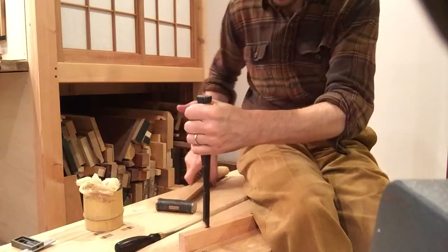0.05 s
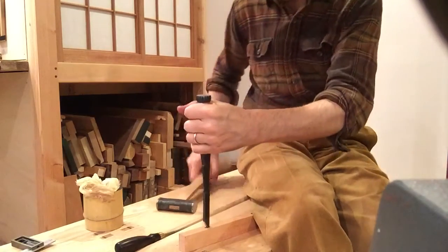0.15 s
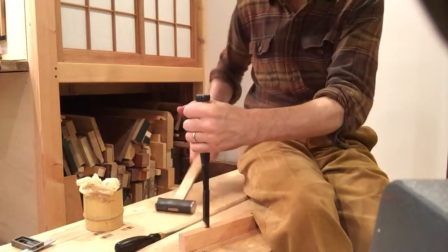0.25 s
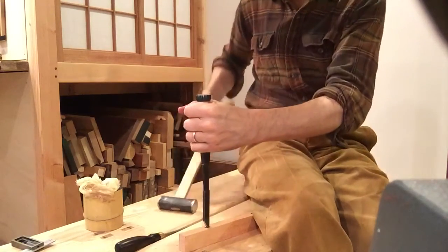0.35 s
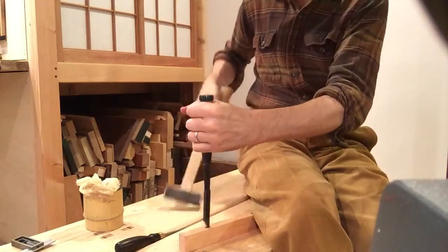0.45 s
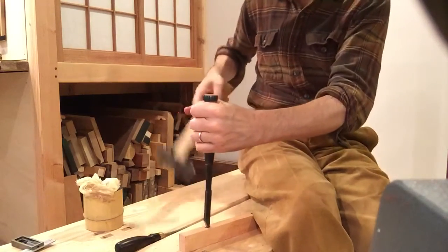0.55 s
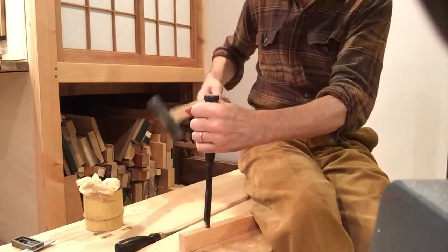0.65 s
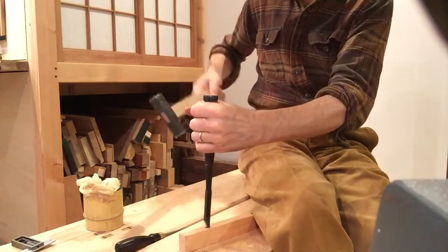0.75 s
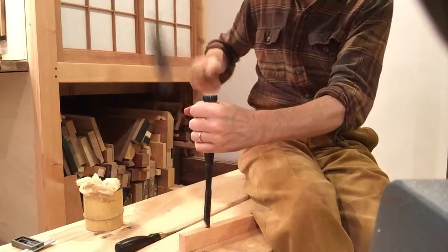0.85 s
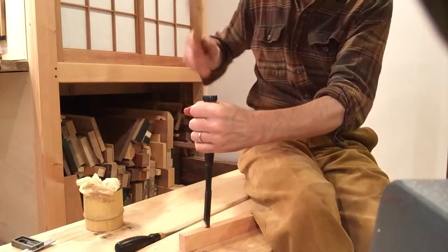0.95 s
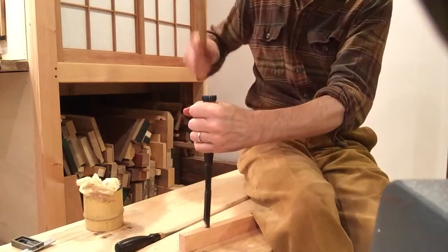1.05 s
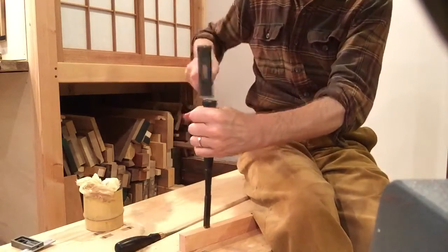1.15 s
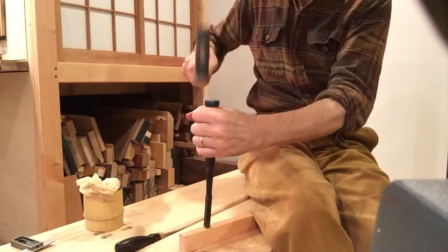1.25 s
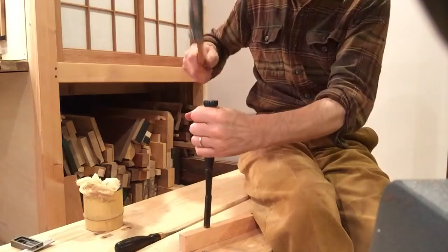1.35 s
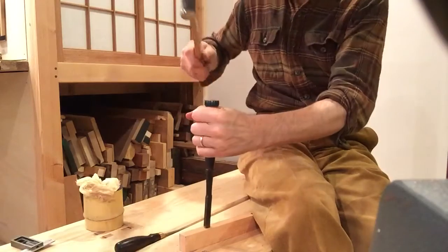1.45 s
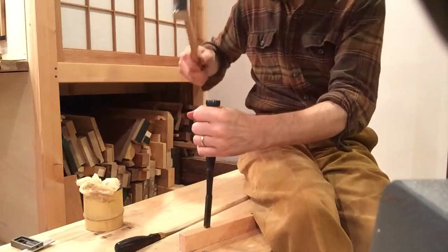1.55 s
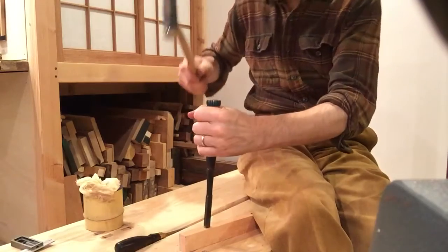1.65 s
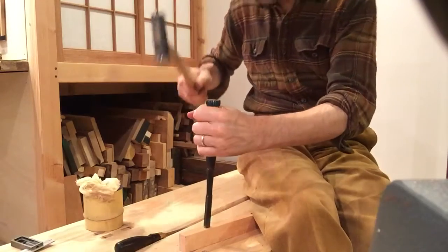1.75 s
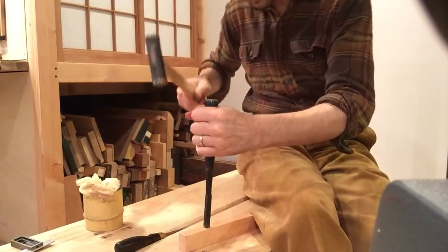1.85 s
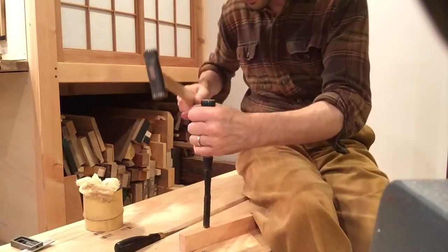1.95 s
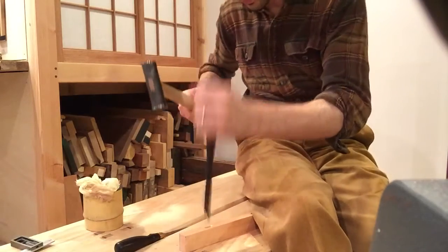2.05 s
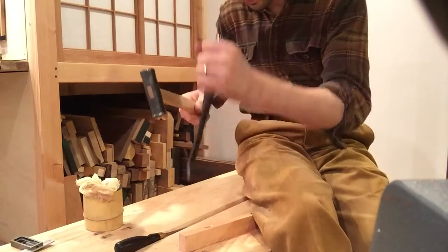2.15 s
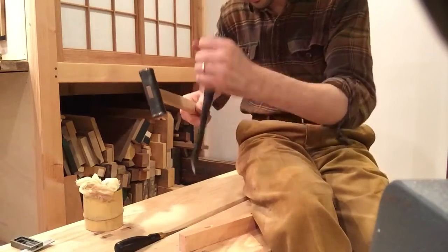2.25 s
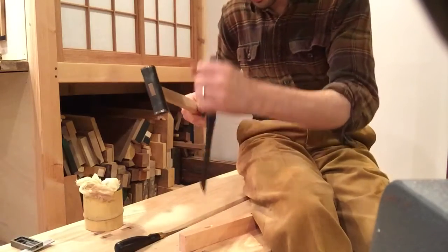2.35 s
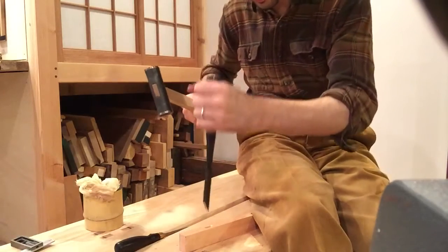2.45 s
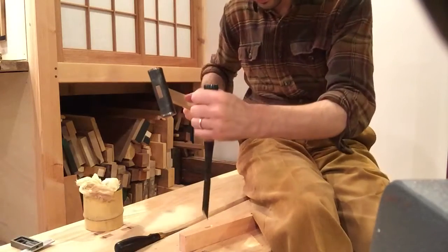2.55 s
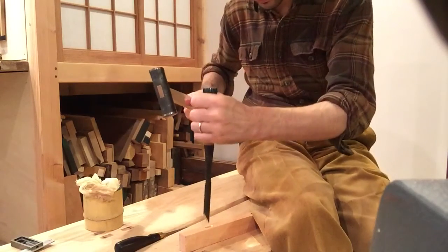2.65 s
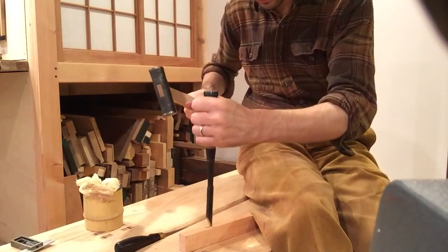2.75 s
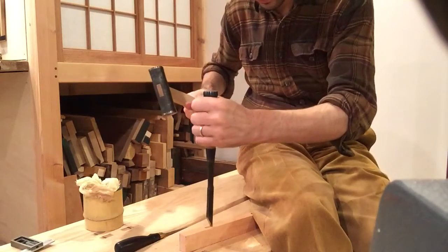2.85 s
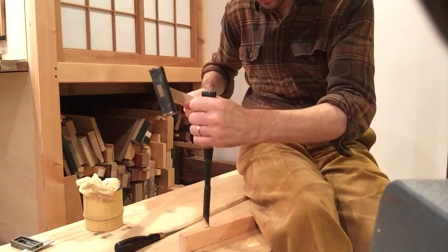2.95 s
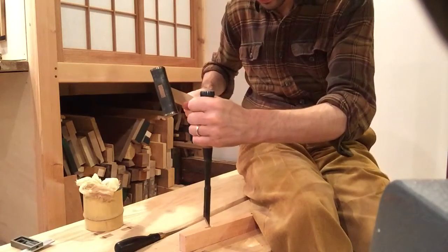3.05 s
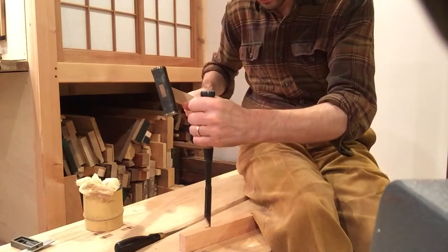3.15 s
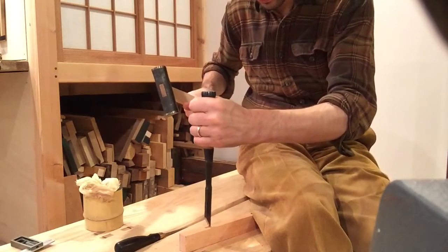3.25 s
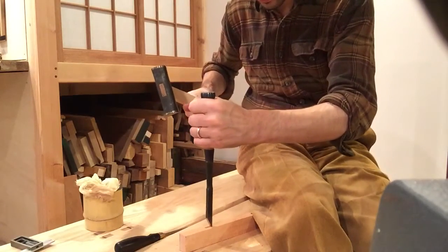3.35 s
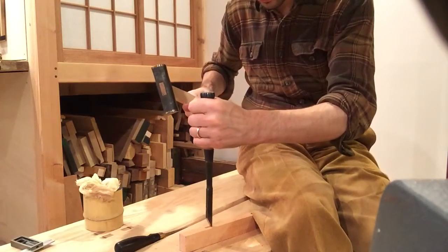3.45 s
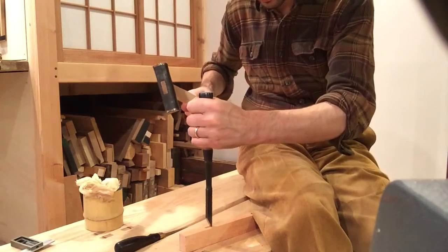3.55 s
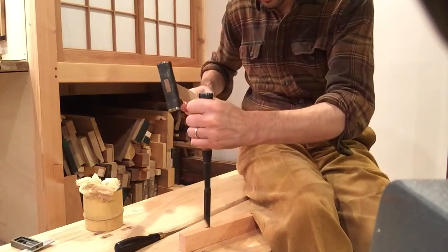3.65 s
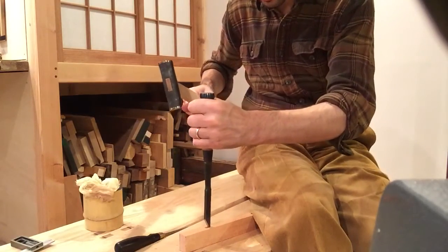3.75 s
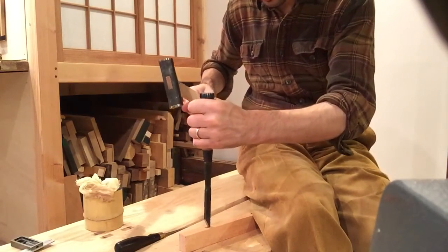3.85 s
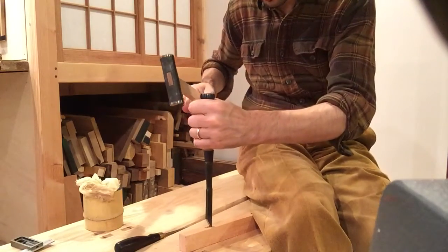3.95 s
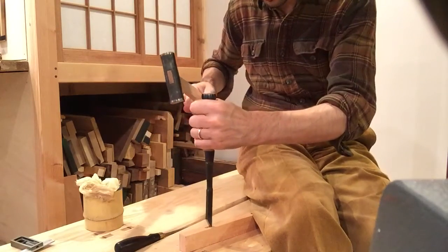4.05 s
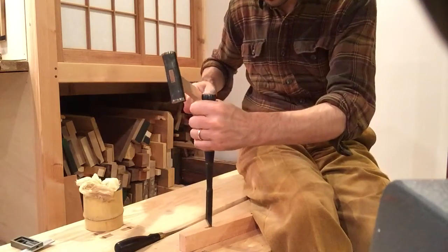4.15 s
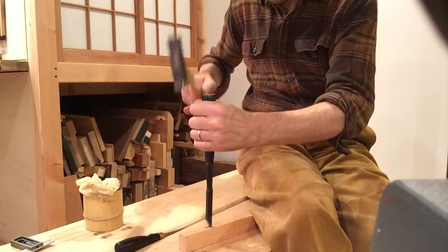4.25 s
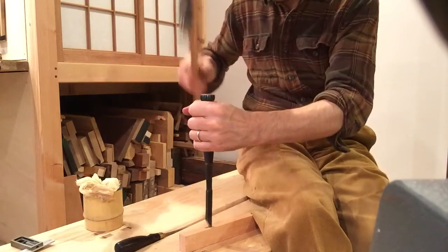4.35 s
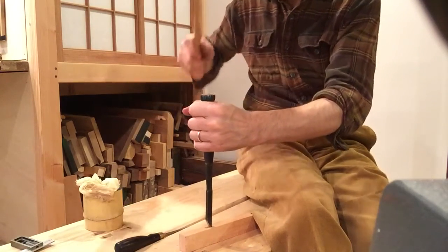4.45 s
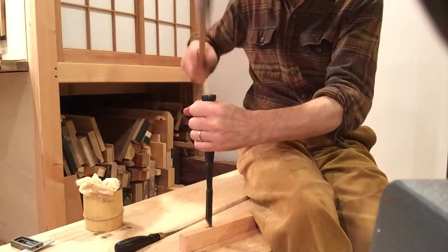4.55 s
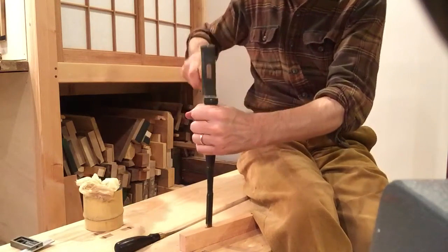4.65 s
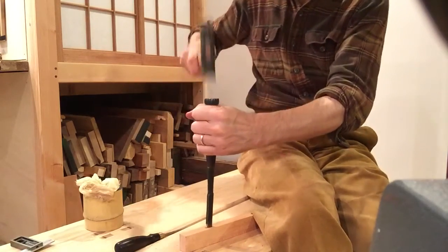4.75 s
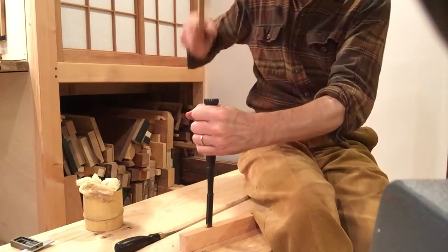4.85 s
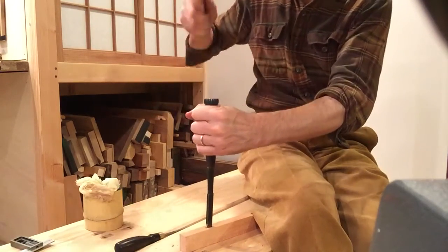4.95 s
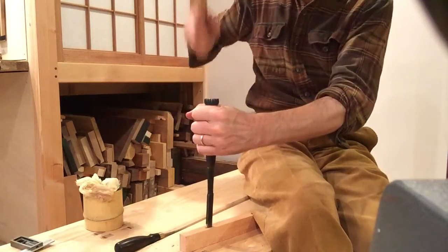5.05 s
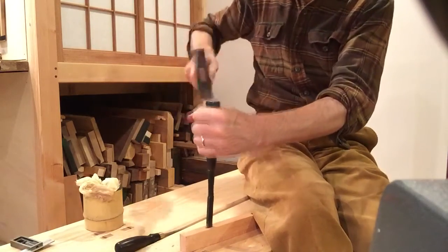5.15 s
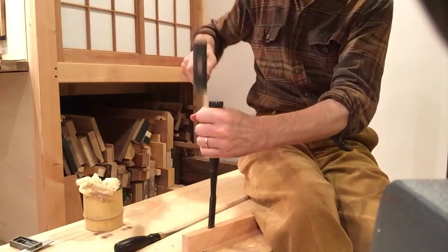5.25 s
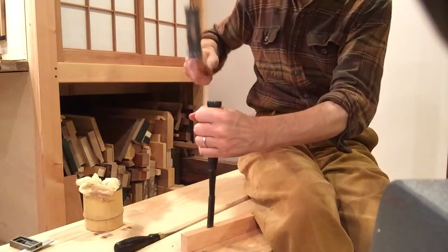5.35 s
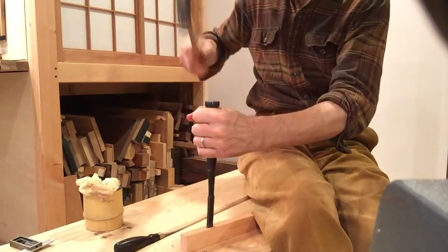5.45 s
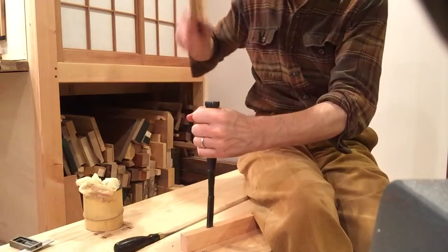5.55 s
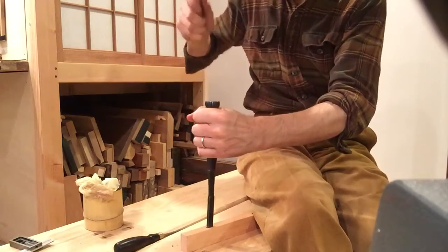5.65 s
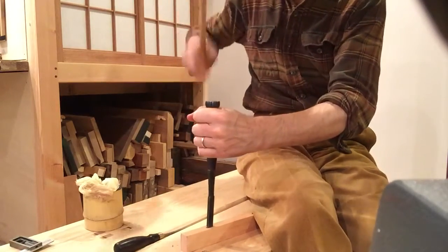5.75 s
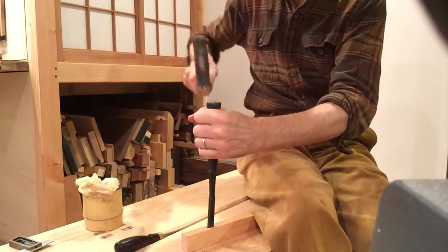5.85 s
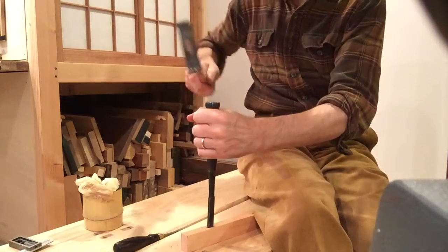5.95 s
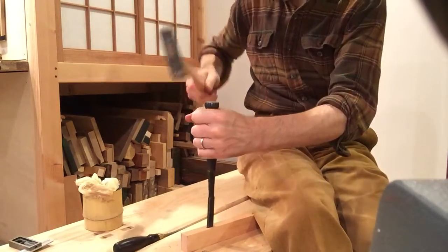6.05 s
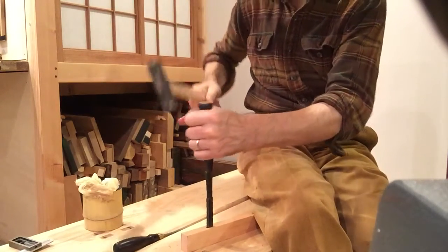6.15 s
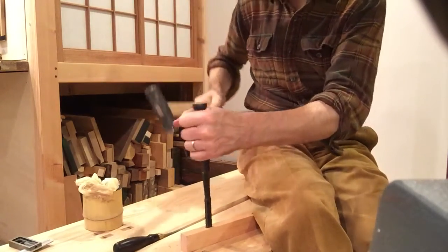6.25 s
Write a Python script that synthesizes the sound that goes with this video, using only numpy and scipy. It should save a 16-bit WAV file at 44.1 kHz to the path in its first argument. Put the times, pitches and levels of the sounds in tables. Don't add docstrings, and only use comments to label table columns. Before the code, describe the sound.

A small wooden workshop, heard very close, with faint hiss and a wavering low rumble from outside. From 0 to 0.5 s a hammer is dragged softly over the bench, a barely audible low wooden rub with sleeve rustle. At 1.15 s a hard steel blow on a chisel cracks out, clipping the input: bright midrange crack, splitting fibres, brief blade ring, bench boom and a rattling tail of under half a second. Around 2.03 s the blade levers out with a quick cluster of knocks, ticks and crunching splinters. Much quieter wooden knocks and edge ticks come near 2.8, 3.15, 3.35, 3.6, 3.92 and 4.28 s. Three more overloaded blows land at 4.63, 5.16 and 5.82 s, the later ones with fuller bench boom and floor thump, loose shelves and tools ringing on shortly. At 6.29 s the steel edge gives one small bright tick.

```python
import sys
import numpy as np
from scipy import signal
from scipy.fft import rfft, irfft
from scipy.io import wavfile

SR = 44100
rng = np.random.default_rng(int(sys.argv[2]) if len(sys.argv) > 2 else 0)


def natural_amplitude(level_db):
    exponent = np.asarray(level_db, float) / 20
    return 10 ** exponent


def to_wav(sig):
    pcm = np.clip(np.atleast_2d(sig), -1, 1) * 32767
    pcm = np.round(pcm).astype(np.int16)
    wavfile.write(sys.argv[1], SR, pcm.T)


N = 278271
T = np.arange(SR // 2) / SR


def hiss():
    return rng.standard_normal(len(T))


def fade(t60):
    return np.exp(-np.log(1000) * T / t60)


def swell(rise_s):
    return 1 - np.exp(-T / rise_s)


def bump(t, centre_s, half_s):
    return np.exp(-((t - centre_s) / half_s) ** 2)


def unit(x):
    return x / np.abs(x).max()


def colour(x, points):
    hz = np.maximum(np.arange(len(x) // 2 + 1) * SR / len(x), 1)
    point_hz, point_db = np.array(points).T
    return irfft(rfft(x) * natural_amplitude(np.interp(np.log(hz), np.log(point_hz), point_db)), len(x))


def band(x, hz, width):
    return signal.lfilter(*signal.iirpeak(hz, hz / width, fs=SR), x)


def steep(x, hz, width):
    return unit(band(band(band(x, hz, width), hz, width), hz, 1.2 * width))


def ring(modes, scatter_db, shorter):
    total = 0
    for hz, db, t60 in modes:
        share, detune = rng.standard_normal(2)
        tone = np.sin(2 * np.pi * hz * (1 + 0.00043 * detune) * T)
        total = total + natural_amplitude(db + scatter_db * share) * fade(t60 * shorter) * tone
    return total


def add(out, s, sound):
    i = int(s * SR)
    out[i:i + len(sound)] += sound[:len(out) - i]


def wander(rate):
    return np.interp(np.arange(N) / SR * rate, np.arange(256), rng.standard_normal(size=256))


# t/s, peak level/dB, chisel ring f/Hz, bench level/dB, depth of the bench tone/0-1
BLOWS = [
    (1.1518, 6.5, 2963, -20.5, 0.37),
    (4.630, 3.5, 3294, -19, 0.53),
    (5.1646, 5, 3012, -14, 0.47),
    (5.8223, 3.5, 3090, -13.5, 0.33),
]
# f/Hz, level/dB, t60/s
BENCH = [(120, -24, 0.41), (184, -1, .3), (200, -7, 0.4), (281.5, -1.5, 0.18), (300, 0.5, 0.15),
         (482, -3.5, 0.075), (790, -20.5, .1), (950, -8.5, .08)]
# f/Hz, level/dB, t60/s
CHISEL = [(1561, -15.5, 0.27), (1771, -17.5, 0.38), (2342, -15, 0.33), (2370, 1, 0.72), (2640, 0.5, 0.37),
          (2981, 0.5, 0.15), (3085, -2.5, 0.26), (3160, -5.5, 0.64), (5000, -17, 0.13), (6175, -31.5, 0.32),
          (6500, -12, 0.3), (7700, -12, 0.19), (7300, -14.5, 0.16), (8947, -23, 0.2)]


def blow(tones, db, ring_hz, bench_db, depth):
    crack = unit(split(*tones) * (fade(0.028) + natural_amplitude(-11.0) * fade(0.1)))
    contact = unit(band(hiss(), 6500.0, 13000.0) * fade(0.0022))
    crack = crack + natural_amplitude(-11.5) * contact
    blade = unit(band(hiss(), ring_hz, 110.0) * fade(0.057))
    steel = unit(ring(CHISEL, 1.5, .4))
    modes = depth * ring(BENCH[:3], 1.5, .5) + (1 - depth) * ring(BENCH[3:], 1.5, 0.78)
    boom = colour(hiss(), [(90, -30.5), (180, -3.5), (300, 0.5), (450, 2.5), (700, -5.5), (1000, -21.5)])
    bench = unit(modes * swell(.004)) + natural_amplitude(-4.5) * unit(boom * fade(0.1) * swell(0.0027))
    mix = natural_amplitude(6.0) * crack + natural_amplitude(-6.5) * blade + natural_amplitude(-24) * steel + natural_amplitude(bench_db - 1.0) * bench
    return natural_amplitude(db) * mix


# f/Hz, level/dB per Hz
SPLIT = [(210, -41.5), (350, -19.5), (700, -14), (1500, -9.5), (3000, -11), (7500, -13.5), (9000, -23.5),
         (16000, -44.5)]
# f/Hz, width/Hz, level/dB
PLANK = [(930, 520, 0), (2350, 430, 5), (2740, 350, 3.5), (3180, 510, 5.5), (4400, 380, -2.5),
         (5820, 900, -1), (7220, 600, 2)]
# end tone level/dB, grain tone f/Hz, grain tone level/dB,
# upper tones level/dB, bench hum in the tail level/dB
ANSWERS = [(10, 1300, 10, -2, -6.5), (4, 1100, 9, -0.5, -9.5), (15.5, 1700, 10, -6, 6.5),
           (5, 1200, 0.5, -5.5, 3)]


def split(end_db, grain_hz, grain_db, upper_db):
    noise = colour(hiss(), SPLIT)
    upper = 0
    for hz, width, db in PLANK:
        scatter_db = 3 * rng.standard_normal()
        upper = upper + natural_amplitude(db + scatter_db) * band(noise, hz, width)
    end = band(noise, 570, 70)
    grain = band(noise, grain_hz, 290)
    return noise + natural_amplitude(upper_db) * upper + natural_amplitude(end_db) * end + natural_amplitude(grain_db) * grain


TINT_HZ = 800, 1150, 1500, 1900, 2350, 2700, 3050, 3800, 4350, 5300, 6400
TINTS = [(0, -4, 0.5, 1.5, 0, -0.5, 2.3, 1.5, -3, 3, 1.5),
         (-1.6, -2.5, -3.5, -0.4, 2.5, 3, 0.1, 0.85, -0.14, .1, .1),
         (-1, -10, 1.5, -1, -2, -4, 2.9, -5, 1, .1, .1),
         (-6, 0, 0.36, 2.5, 2.5, -1.23, 1.5, -0.5, 1.5, .1, .1)]


def tinted(sound, tint, treble_db):
    return colour(sound, [(600, 0), *zip(TINT_HZ, tint), (7800, 0), (9000, treble_db)])


# f/Hz, level/dB, t60/s
SEATED_HIGH = [
    [(1206, -13.5, 0.13), (1470, -9.5, 0.3), (2320, 0, 0.14), (2498, -5, 0.14), (2770, -10, 0.21),
     (2966, -3, 0.12), (3180, -2.5, 0.22), (3462, -10.5, 0.35), (4000, -11, 0.25), (4250, -15, 0.15)],
    [(1294, -10, 0.25), (2225, -0.5, 0.1), (2400, -7, 0.2), (2610, -8, 0.2), (2724, -14, 0.44),
     (2990, -6.5, 0.15), (3180, -7.5, 0.21), (3430, -8, 0.16), (4118, -14, 0.097), (4450, -16.5, 0.29)],
    [(1510, -12.5, 0.33), (1583, -4.5, 0.26), (1820, -14.5, 0.3), (1980, -20.5, 0.58), (2300, -12.5, 0.48),
     (2830, -10, 0.2), (3050, 1.5, 0.19), (3000, -3, 0.15), (3530, -12, 0.14), (3570, -12, 0.16)],
    [(1400, -8.5, 0.15), (1804, -19.5, 5.0), (2180, -15.5, 0.97), (2360, -3.5, 0.2), (2820, -13, 0.43),
     (3190, 0, 0.13), (3240, -4.5, 0.21), (3360, -8.5, 0.11), (3849, -19, 0.36), (4452, -13, 0.23)],
]
SEATED_LOW = [
    [(285, 0, 0.098), (490, -7, 0.14), (824, -10.5, 0.095), (930, -10, 0.11)],
    [(188, -9, 0.24), (296, 0.5, 0.093), (504, -14, 0.23), (830, -9, 0.13)],
    [(186, -1.5, 0.11), (280, 1, .1), (300, -8, 0.25), (497, -11.5, .2), (593, -11, 0.13), (760, -12, 0.2),
     (967, -10.5, 0.079)],
    [(185, -12.5, 0.13), (280, -3.5, .09), (309.3, -16.5, 0.25), (498, -9.5, 0.12), (400, -7.5, 0.064),
     (573, -15, .1)],
]
# high notes level/dB, low notes level/dB, treble level/dB, jolt through the stand level/dB
SEATS = [(-14, -22, 2.5, -55), (-11, -24.5, -1, -35.5), (-10.5, -5, -1.5, -31), (-12, 1.5, 3.5, -27)]


def notes_of(modes):
    total = 0
    for k, (hz, db, t60) in enumerate(modes):
        tone = np.sin(2 * np.pi * hz * T + k * k)
        total = total + natural_amplitude(db) * fade(min(t60, .28)) * tone
    return unit(total)


def seated(high, low, high_db, low_db, jolt_db):
    jolt = unit(np.sin(2 * np.pi * 42 * T) * fade(0.078) * swell(.004))
    high_notes = natural_amplitude(high_db) * notes_of(high) * swell(.0015)
    low_notes = natural_amplitude(low_db) * notes_of(low) * swell(.003)
    return high_notes + low_notes + natural_amplitude(jolt_db) * jolt


# floor thump level/dB, thump f/Hz, far end of the shop level/dB, level/dB of the haze just
THUMPS = [(-28.5, 100, -30, -44.5), (-30, 69, -33, -46.5), (-22.5, 110, -28, -42.5), (-30, 98, -28.5, -39)]
# f/Hz, level/dB per Hz
CRACK = [(350, -30.5), (600, -6.5), (1450, -6), (3190, -6.5), (4900, -10.5), (7500, -10.5), (8600, -22),
         (16300, -43.5)]
# f/Hz, level/dB
LATE = [(150, -5.5), (420, -12.5), (950, -8.5), (1400, -2.5), (3000, 0), (7000, -1), (9500, -2.5),
        (14000, -14.5)]
# f/Hz, width/Hz, level/dB
RATTLES = [(930, 76, -15), (1555, 51, -7.5), (2320, 84, -3), (2980, 120, -4.5), (3400, 80, -7.5),
           (4300, 110, -8), (5400, 80, -8), (5895, 81, -12.5), (6860, 110, -11.5), (7200, 90, -12.5),
           (8600, 1500, -10.5)]


def aftermath(hum_db, thump_db, thump_hz, far_db):
    thump = unit(np.sin(2 * np.pi * thump_hz * T) * fade(0.17) * swell(0.0098))
    rings = 0
    for hz, width, db in RATTLES + [(280, 79, hum_db)]:
        rings = rings + natural_amplitude(db) * band(hiss(), hz, width) / np.sqrt(width)
    far = colour(colour(hiss(), CRACK), LATE)
    far = far / far.std() * fade(0.55) + natural_amplitude(-5.5) * rings / rings.std() * fade(0.71)
    ending = 1 / (1 + (T / 0.44) ** 8)
    return natural_amplitude(thump_db) * thump + natural_amplitude(far_db) * far * swell(0.012) * ending


# above f/Hz, t after the blow/s, loss level/dB
DROPS = [
    (13260, .065, -3),
    (13000, 0.16, -10),
    (9600, 0.17, -7.5),
    (8170, 0.25, -4),
]


def dropped(x):
    for hz, after_s, loss_db in DROPS:
        gone = np.zeros(N)
        for s, *_ in BLOWS:
            add(gone, s + after_s, swell(.004)[:SR // 4])
        top = signal.sosfiltfilt(signal.butter(8, hz, "highpass", fs=SR, output="sos"), x)
        x = x - (1 - natural_amplitude(loss_db)) * gone * top
    return x


def haze():
    out = np.zeros(N)
    lead_s = .0232
    tilt = [(400, -4.0), (1500, -4.5), (3000, 0.1), (8000, -5.5), (12000, -4.0)]
    for (s, *_), (*_, db) in zip(BLOWS, THUMPS):
        noise = colour(colour(hiss(), CRACK), tilt)
        puffs = fade(.03) * np.sin(np.pi * T / .003) ** 2
        shape = (1 + natural_amplitude(5) * puffs + (T / lead_s) ** 4) * (T < lead_s)
        add(out, s - lead_s, natural_amplitude(db) * noise / noise.std() * swell(.001) * shape)
    return out


# t/s, peak level/dB, plank tone f/Hz, bench level/dB, depth of the bench tone/0-1
KNOCKS = [(0.065, -68, 960, -9, 0.6), (0.172, -74, 970, -7.5, 0.6), (2.027, -30, 790, 1.5, 0.36),
          (2.036, -29.5, 913, -43, 0.7), (2.048, -30.5, 550, -4, 0.01), (2.786, -43.5, 700, -8, 0.07),
          (3.015, -64, 684, -5.5, 0.4), (3.158, -35.5, 717, -26, 0.13), (3.331, -46, 840, -0.5, 0.98),
          (3.34, -47.5, 765, 3, 0), (3.36, -59.5, 822, 18, 0.05), (3.593, -52, 837, -3, 0.36),
          (3.602, -46.5, 852, -32.5, 0.78), (3.615, -63, 810, 10.5, 0.2), (3.909, -52.5, 715, -21, 0.6),
          (3.921, -54, 960, -30.5, 0.7), (3.926, -50, 1016, 3, 0.4), (3.955, -57.5, 677, 13, 0.28),
          (4.12, -80, 600, 20, 0.3), (4.282, -58.5, 880, -6, 0.23)]


def knock(db, tone_hz, bench_db, depth):
    touch = hiss() * fade(0.032) * swell(0.0012)
    plank = steep(touch, tone_hz, 474.0) + natural_amplitude(-11.0) * steep(touch, 830.0, 780.0)
    handle = steep(touch, 2200.0, 610.0)
    bench = depth * ring(BENCH[1:3], 0.66, 0.31) + (1 - depth) * ring(BENCH[3:6], 0.98, 0.25)
    return natural_amplitude(db + 1.5) * (plank + natural_amplitude(-45) * handle + natural_amplitude(bench_db) * unit(bench * swell(0.061)))


# f/Hz, width/Hz
EDGE = [(4400, 1390), (7200, 2400), (11400, 2000)]
# t/s, peak level/dB, blade f/Hz, lowest edge resonance level/dB, sharpness level/dB
TICKS = [(2.0245, -41.5, 2340, -9, -44), (2.031, -34.5, 2605, -23.5, -51), (2.046, -49.5, 3160, -25, -45),
         (2.7844, -64, 2770, -10, -16), (2.9144, -66.5, 3300, -14.5, -17.5), (3.1592, -42, 2710, -32, -20),
         (3.3363, -50, 2280, -11.5, -2), (3.5938, -58, 2657, -15, -14), (3.5992, -58, 2350, -2.5, 6.5),
         (3.6016, -50, 2607, -5.5, -5), (3.925, -34, 2454, -14.5, -14), (3.9454, -51, 2646, -22.5, -11),
         (4.2814, -80, 2800, -12, -14), (6.2929, -25.5, 2810, -9, -12.5)]


def tick(db, blade_hz, low_db, sharp_db):
    touch = hiss() * fade(0.016)
    middle_db = -8 + 0.32 * sharp_db
    sound = steep(touch, blade_hz, 930.0)
    for (hz, width), edge_db in zip(EDGE, (low_db, middle_db, sharp_db)):
        sound = sound + natural_amplitude(edge_db) * steep(touch, hz, width)
    return natural_amplitude(db) * sound


# f/Hz, level/dB
TEAR = [(300, 0), (800, 5), (1500, 17.5), (3000, -4), (6000, -14), (9000, -31), (15000, -32.5)]
# t/s, peak level/dB, t60/s, strongest f/Hz
TEARS = [(2.018, -50, 0.058, 1102), (2.026, -32, 0.028, 1490), (2.034, -35, 0.069, 1484),
         (2.048, -43, 0.18, 1295), (3.333, -49, 0.047, 1003), (3.345, -62.5, 0.043, 1900),
         (3.591, -51.5, 0.043, 996), (3.61, -66, 0.035, 2300), (3.92, -41.5, 0.069, 1053),
         (3.94, -58, 0.046, 3495), (4.283, -65, .05, 1950), (6.2935, -39, 0.04, 1608)]


def tear(db, t60, tone_hz):
    shifted = [(hz * tone_hz / 1500, level_db) for hz, level_db in TEAR]
    return natural_amplitude(db) * unit(colour(hiss(), shifted) * fade(t60) * swell(0.00064))


# t/s, peak level/dB, f/Hz, t60/s, width/Hz
PINGS = [(0.029, -59, 980, 0.15, 60), (0.062, -59.5, 980, 0.14, 78), (0.17, -60, 950, 0.083, 160),
         (2.915, -63, 3305, 0.045, 150), (3.162, -50, 1603, 0.11, 400), (3.205, -57, 1570, 0.12, 250),
         (3.338, -54, 2510, 0.094, 349), (3.605, -47, 1786, 0.039, 347),
         (3.93, -49.5, 2586, 0.23, 450), (3.931, -45, 675, 0.098, 200),
         (2.038, -66, 7200, 0.13, 1200), (3.602, -61.5, 7100, 0.09, 700),
         (3.927, -63, 7000, 0.095, 802), (3.93, -63, 4600, 0.067, 1500),
         (3.603, -64, 4560, 0.039, 896), (3.158, -69, 3080, 0.034, 904),
         (3.34, -69, 4500, 0.046, 1500),
         (1.2, -35, 1387, 0.42, 200), (1.202, -38, 3140, 0.42, 503.4), (1.25, -45, 2260, 0.36, 400),
               (2.04, -47, 1260, 0.28, 499), (2.161, -61, 185.7, 0.44, 50), (4.636, -16, 2640, 0.11, 300),
               (4.661, -26.5, 1306, 0.31, 200), (4.681, -38.5, 2210, 0.43, 200),
               (4.8, -54, 1365, 0.52, 149.5), (5.191, -22, 3150, 0.17, 251.6), (5.2, -37, 2950, 0.36, 251),
               (5.2, -35.5, 728, 0.34, 152.8), (5.219, -30, 1485, 0.41, 300), (5.25, -36, 994, 0.43, 300),
               (5.301, -43.5, 187, 0.38, 30), (5.47, -71, 1592, 1.5, 45), (5.829, -15.5, 519, 0.15, 91.7),
               (5.925, -33.5, 300, 0.25, 90.5), (5.952, -49.5, 1070, 0.45, 200),
               (5.964, -38, 188, 0.28, 30.1), (6.119, -70, 1596, 0.89, 70),
         (1.155, -15.5, 510, 0.11, 60), (1.156, -14.5, 1598, .08, 353.4),
               (3.149, -54, 700, 0.052, 400), (3.159, -33, 1620, 0.024, 440), (3.308, -61, 798, 0.14, 400),
               (3.312, -66.5, 2541, 0.088, 300), (3.339, -58, 1630, 0.079, 351),
               (3.603, -59, 2510, 0.1, 250), (3.603, -58, 848, 0.1, 250), (3.908, -53.5, 1693, 0.045, 300),
               (3.909, -62, 3000, 0.046, 500), (3.95, -55, 950, 0.15, 300), (4.104, -55, 290.5, 0.22, 60),
               (4.11, -70, 2506, 0.16, 200), (4.28, -54.5, 857, 0.095, 80), (4.64, -22, 558.6, 0.22, 200),
               (4.68, -17, 1010, .05, 504), (5.168, -17.5, 504, 0.16, 69), (5.168, -18, 775, .08, 200),
               (5.17, -22.5, 1575, 0.069, 120), (5.7992, -31.5, 3594, 0.014, 3020),
               (5.811, -43, 4240, 0.017, 3020), (5.812, -32.5, 280, .1, 200),
               (5.824, -10, 2120, .07, 501.4), (5.83, -10, 5000, 0.077, 250.1),
               (5.83, -14.5, 6370, 0.19, 700),
         (2.0125, -52, 6996, .012, 6000), (2.024, -64, 9970, 0.01, 4000), (2.033, -63, 11030, 0.027, 4000),
         (2.050, -66, 11000, .02, 4000), (2.032, -46, 3000, 0.14, 1000), (2.786, -73, 1020, 0.058, 250),
         (3.1545, -60, 9000, .012, 7000), (3.1545, -67, 14000, .012, 2500), (3.160, -68, 14000, .012, 2500),
         (3.599, -63, 14000, 0.018, 2500), (3.604, -65, 13500, .04, 2000), (3.925, -64, 14000, .02, 2500),
         (5.799, -48, 11070, .015, 5000), (5.811, -54.5, 10950, 0.011, 5000),
         (6.166, -66, 10670, .012, 1500), (6.2925, -34.5, 7040, 0.019, 900), (6.297, -47, 7400, 0.19, 400),
         (6.2925, -57, 14200, 0.018, 900), (1.168, -16.5, 2400, 0.031, 2500),
         (1.203, -22, 2200, 0.039, 2500), (1.221, -29, 2800, 0.042, 900), (4.650, -19, 2800, .03, 1200),
         (4.680, -23, 2500, .03, 2500), (4.701, -26, 2720, 0.068, 150), (4.734, -30, 2200, 0.031, 2000),
         (5.196, -18, 3000, .04, 1200), (5.822, -7.5, 2440, 0.075, 160), (5.860, -20.5, 2390, 0.062, 250),
         (1.153, -15, 1854, .1, 350), (1.153, -12, 1464, .12, 60.27), (1.154, -18.5, 494.5, .2, 40.08),
         (5.166, -13, 3048, .12, 120), (5.3, -47.5, 3020, .55, 200), (5.301, -54, 4600, .4, 500),
         (5.33, -51.5, 2350, 0.5, 149.4), (4.632, -22, 4183, .07, 300), (4.634, -14, 3316, .09, 80.2),
         (4.78, -51.5, 2300, .5, 904), (3.934, -56, 800, .15, 500), (6.03, -55, 5440, 0.68, 2500)]


def ping(db, hz, t60, width):
    cluster = steep(hiss(), hz, 1.2 * width)
    return natural_amplitude(db - 2.5) * swell(.0012) * fade(t60) * cluster / cluster.std()


# t/s, pressure level/dB, speed/0-1
DRAG = [
    (0.0, -91, .3),
    (0.04, -60.5, 0.48),
    (0.094, -87, 1),
    (0.252, -71, .3),
    (0.316, -58, 0),
    (0.356, -63.5, 0.91),
    (0.43, -58, 0.89),
    (0.47, -60, .9),
    (0.49, -89, 1),
]
# f/Hz, level/dB
RUBBED = [((190, -8.5), (285, 0.5)), ((495, 2),), ((778, -1.5), (960, -16))]
SLOW_LOSS_DB = (-3, -27, -30)
# t/s, peak level/dB, length/s
RUSTLES = [
    (0.04, -71.5, 0.05),
    (0.32, -73.5, 0.18),
    (0.66, -74, 0.074),
]


def drag():
    s, pressure_db, speed = np.transpose(DRAG)
    t = np.arange(SR) / SR
    cloth = [(2500, -2.5), (4400, -5.5), (7000, -3.0), (9000, -13), (13000, -12)]
    rustle = colour(rng.standard_normal(SR), cloth)
    brushes = sum(natural_amplitude(db) * bump(t, at, length) for at, db, length in RUSTLES)
    out = brushes * rustle / rustle.std()
    for loss_db, group in zip(SLOW_LOSS_DB, RUBBED):
        group_db = np.interp(t, s, pressure_db + loss_db * (1 - speed))
        for hz, db in group:
            hum = band(band(rng.standard_normal(SR), hz, 25.0), hz, 98.0)
            out += natural_amplitude(group_db + db) * hum / hum.std() * (t < s[-1])
    return out


# f/Hz, t60/s
SHOP_T60 = [(100, 0.56), (260, 0.41), (700, 0.26), (1840, 0.27), (4850, 0.32), (12800, 0.24)]


def shop():
    hz, t60 = np.transpose(SHOP_T60)
    tail = 0
    for centre in 90 * 2 ** np.arange(0, 7.6, .5):
        noise = band(band(hiss(), centre, centre / 2), centre, centre / 2)
        tail = tail + noise * fade(0.8 * np.interp(np.log(centre), np.log(hz), t60))
    tail = tail * swell(0.0037)
    tail = tail / np.sqrt(np.sum(tail ** 2)) * natural_amplitude(-8.0)
    tail[0] = 1
    return tail


# f/Hz, level/dB per Hz
FLOOR = [(22, -23), (40, -8.5), (125, -1.5), (165, -23.5), (520, -29), (7200, -37), (9500, -43),
         (16300, -44)]
# t/s, extra level/dB, half length/s
SWELLS = [(0.035, 5, 0.092), (0.377, 8, 0.04), (0.9, 3, .2), (1.4, 2.5, .12), (1.896, 2.5, 0.11),
          (2.297, 5, 0.17), (3.003, 3.5, 0.163), (3.45, 3.5, 0.32), (4.499, 4, .12), (5.056, 7, 0.097),
          (5.427, 8, .05), (5.597, 0.5, .1), (5.753, 6.5, .04)]


def floor():
    noise = colour(rng.standard_normal(N), FLOOR)
    low = signal.sosfiltfilt(signal.butter(4, 155, fs=SR, output="sos"), noise)
    t = np.arange(N) / SR
    swell_db = sum(db * bump(t, s, half_s) for s, db, half_s in SWELLS)
    rumble_db = -66.5 + swell_db + 2.5 * wander(8.9)
    duck_db = sum(-2 * (t > s) * bump(t, s, .45) for s, *_ in BLOWS)
    return natural_amplitude(-62.5 + duck_db) * (noise - low) / noise.std() + natural_amplitude(rumble_db) * low / low.std()


def scene():
    loud, soft, near, after = np.zeros(N), np.zeros(N), floor(), np.zeros(N)
    add(near, 0, drag())
    for (s, *row), answer, tint, high, low, seat, thump in zip(
            BLOWS, ANSWERS, TINTS, SEATED_HIGH, SEATED_LOW, SEATS, THUMPS):
        *tones, hum_db = answer
        high_db, low_db, treble_db, jolt_db = seat
        add(loud, s, tinted(blow(tones, *row), tint, treble_db) * (T < .3))
        add(after, s, aftermath(hum_db, *thump[:3]))
        add(after, s, seated(high, low, high_db, low_db, jolt_db))
    pings = PINGS
    for table, source, bus in ((KNOCKS, knock, soft), (TICKS, tick, soft), (TEARS, tear, soft),
                               (pings, ping, near)):
        for s, *row in table:
            add(bus, s, source(*row))
    room = shop()
    flutter = natural_amplitude(1.5 * wander(38))
    blows = dropped(signal.fftconvolve(loud, room)[:N] + after * flutter)
    touches = signal.fftconvolve(soft, room * fade(1.0))[:N]
    return (blows + touches + near)[None]


def band_limit(x):
    return signal.sosfilt(signal.butter(12, 15850, fs=SR, output="sos"), x)


def record(dry):
    mix = np.clip(natural_amplitude(1.5) * dry, -.85, .85) + haze()
    mix = signal.sosfilt(signal.ellip(8, .2, 60, 15700, fs=SR, output="sos"), mix)
    mix = signal.sosfilt(signal.butter(2, 26, "highpass", fs=SR, output="sos"), mix)
    return band_limit(mix)


dry = scene()
out = record(dry)
to_wav(out)
```